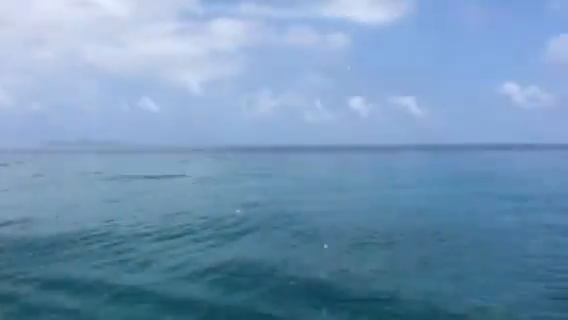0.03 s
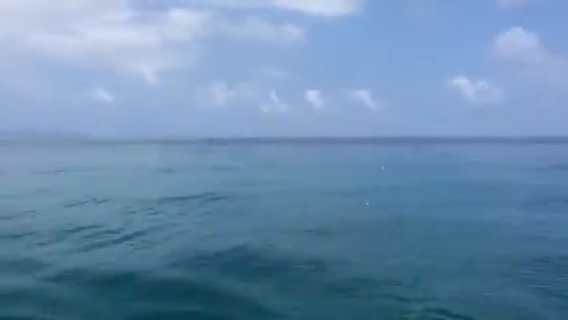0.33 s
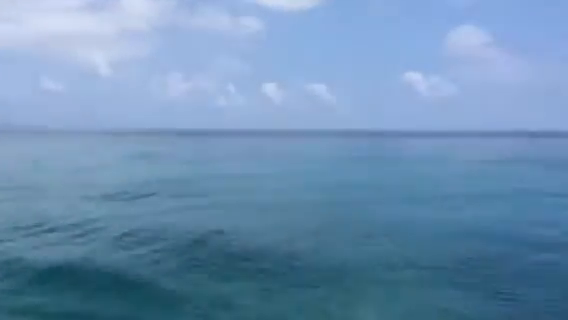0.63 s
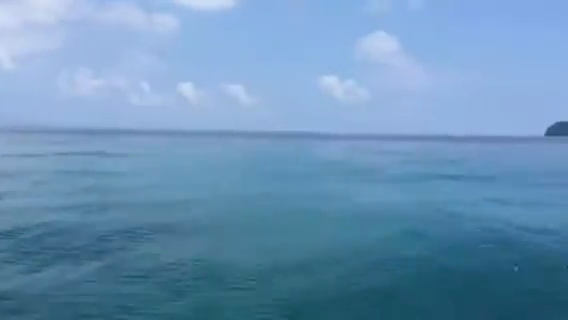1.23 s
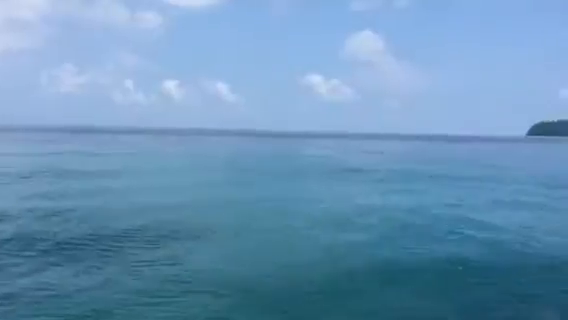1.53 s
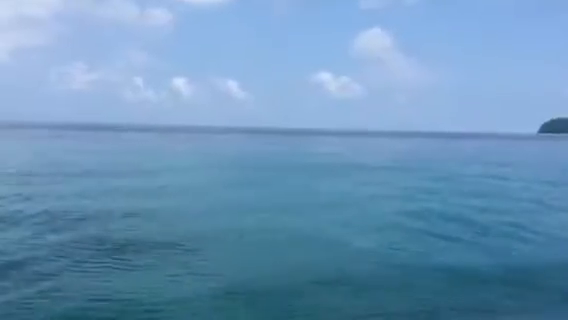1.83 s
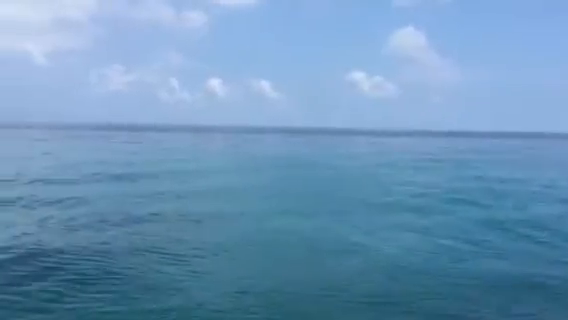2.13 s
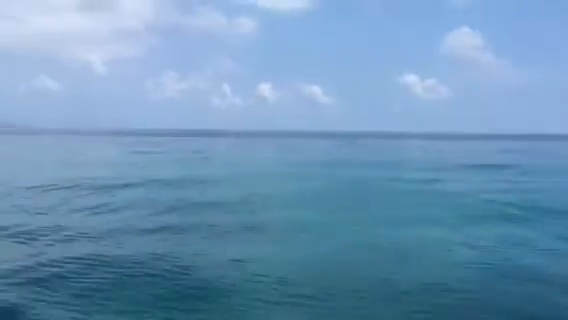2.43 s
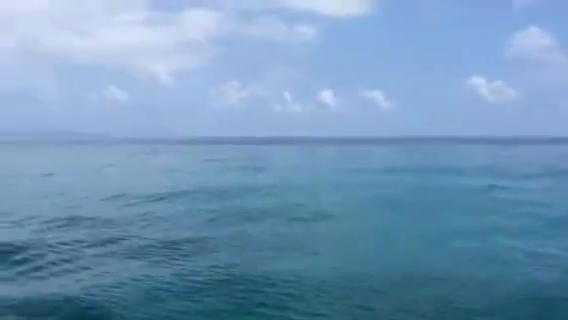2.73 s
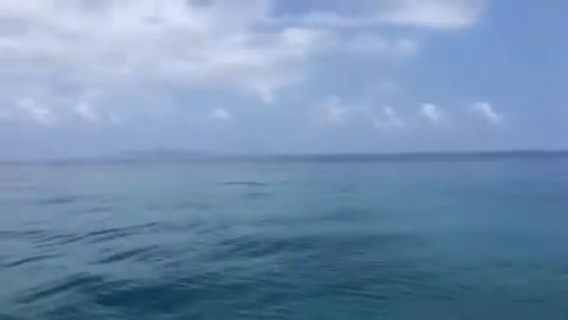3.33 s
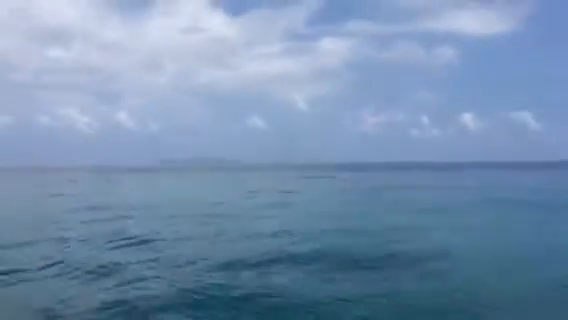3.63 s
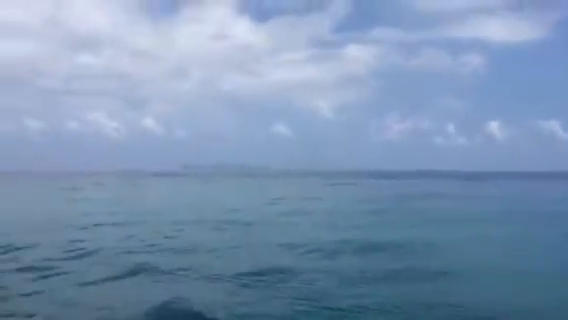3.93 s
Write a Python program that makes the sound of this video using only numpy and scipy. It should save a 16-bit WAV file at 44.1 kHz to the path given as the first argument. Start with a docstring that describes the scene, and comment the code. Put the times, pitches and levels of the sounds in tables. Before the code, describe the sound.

A single-cylinder boat engine, heard on board on open sea, thumps rapidly with squeaks and rattles, then slows. Water hisses and slaps along the hull, and spray swells midway before fading.

```python
"""A single-cylinder long-tail boat engine, heard on board, starts near ten strokes a second over hull
rumble, rattling loose parts and hissing wash. Each stroke is an exhaust thump, a squeak, a hollow pipe
ring and a rasping knock that booms in the hull. Droplets tick and water slaps as it is throttled back.
Near 2 s spray swells and the squeak dies away; by 4 s the engine is near five strokes a second and the
water has faded."""
import sys
import numpy as np
from scipy.fft import rfft, irfft, next_fast_len
from scipy.io import wavfile
from scipy.ndimage import map_coordinates

SR = 44100
rng = np.random.default_rng(int(sys.argv[2]) if len(sys.argv) > 2 else 0)


def to_wav(sig):
    """Store sig (one row per channel, or 1-D mono) as 16-bit WAV at the path in sys.argv[1].

    Samples outside -1..1 are clipped; the rate is SR.
    """
    pcm = np.clip(np.atleast_2d(sig), -1, 1) * 32767
    pcm = np.round(pcm).astype(np.int16)
    wavfile.write(sys.argv[1], SR, pcm.T)  # frames by channels


N = 176400

# engine speed (time [s], rate [strokes/s])
STROKE_RATE = [(0.0, 9.798), (0.4, 9.15), (0.8, 8.868), (1.15, 8.374), (1.42, 8.953), (1.7, 7.571),
               (2.0, 7.502), (2.7, 6.343), (3.3, 5.444), (4.0, 5.359)]
# spectrum of wash and droplets (frequency [Hz], gain [dB])
FIZZ_COLOUR = [(500, -56), (3000, 5), (4800, 3), (7200, -0.5), (9500, 4), (10500, 1), (11300, 5),
               (15500, 1.5)]
FLUTTER_DB = 1.3


def amp(db):
    """Decibels to gain."""
    return 10 ** (np.asarray(db) / 20)


def unit(x):
    """Scale to rms 1."""
    return x / np.sqrt(np.mean(x ** 2) + 1e-20)


def curve(rows, column=1):
    """One column of (time [s], value, ..) rows, interpolated per sample."""
    columns = np.transpose(rows)
    return np.interp(np.arange(N) / SR, columns[0], columns[column])


def wobble(knots_per_s):
    """Smooth random curve."""
    return map_coordinates(rng.standard_normal(4000), [np.arange(N) * knots_per_s / SR], mode="wrap")


def wavering(hz, scatter_hz, knots_per_s):
    """Tone of straying pitch, rms 1."""
    return np.sqrt(2) * np.sin(2 * np.pi * np.cumsum(hz + scatter_hz * wobble(knots_per_s)) / SR)


def filtered(x, response):
    """x through a frequency response."""
    m = next_fast_len(N + SR // 2)
    return irfft(rfft(x, m) * response(np.fft.rfftfreq(m, 1 / SR)), m)[:N]


def coloured(x, points):
    """x through a (frequency [Hz], gain [dB]) curve, rms 1."""
    hz, db = np.transpose(points)
    return unit(filtered(x, lambda f: amp(np.interp(np.log(f + 1), np.log(hz), db))))


def resonant(x, modes):
    """x through steep resonances (centre [Hz], width [Hz], gain [dB]), rms 1."""
    def band(f, hz, width_hz):
        return 1j * f * width_hz / (hz * hz - f * f + 1j * f * width_hz)

    def response(f):
        return sum(amp(db) * band(f, hz, width_hz) * band(f, hz, hz) for hz, width_hz, db in modes)
    return unit(filtered(x, response))


def noise():
    """White noise."""
    return rng.standard_normal(N)


def grains(per_s, bed_db):
    """Tiny random impacts on a noise bed."""
    return unit(noise() * (rng.random(N) < per_s / SR)) + amp(bed_db) * noise()


def pings(per_s, hz, octaves, cycles, spread_db):
    """Small ringing impacts or bubbles of random pitch and size, rms 1."""
    when, pitch, size, life = rng.random((int(per_s * N / SR), 4)).T[:, :, None]
    ping_hz = hz * 2 ** (octaves * (pitch - .5))
    t = np.arange(SR // 25) / SR
    gain = amp(-spread_db * np.log(1 - .97 * size))
    decay = np.exp(-ping_hz * t / (cycles * (.5 + life)))
    rings = gain * np.sin(2 * np.pi * ping_hz * t) * decay
    index = (when * N).astype(int) + np.arange(len(t))
    return unit(np.bincount(index.ravel(), rings.ravel(), N)[:N])


def bell(x, width):
    """Gaussian, peak 1 at x = 0."""
    return np.exp(-.5 * (x / width) ** 2)


def blows(times_s, levels_db, rise_s, fall_s):
    """Envelope: a rounded swell at each time."""
    t = np.arange(N) / SR
    return sum(amp(db) * bell(t - s, np.where(t < s, rise_s, fall_s))
               for s, db in zip(times_s, levels_db))


def impacts(rows, rise_s, fall_s):
    """Envelope: a sharp peak per (time [s], level [dB]) row; rise and fall span 60 dB."""
    t = np.arange(N) / SR
    return sum(amp(db - 60 * np.minimum(np.abs(t - s) / np.where(t < s, rise_s, fall_s), 2))
               for s, db in rows)


def turns():
    """Engine cycles per sample, accumulated; firings fall on whole numbers."""
    return .04 + np.cumsum(curve(STROKE_RATE)) / SR


def gate(at, rise, fall):
    """One swell per cycle; arguments in cycles."""
    offset = (turns() - at + .5) % 1 - .5
    return bell(offset, np.where(offset < 0, rise, fall))


def strokes(at):
    """Per sample: nearest stroke's index and time [s] since its phase `at` [cycles]."""
    turn = turns() - at
    nearest = np.round(turn)
    return nearest.astype(int) + 1, (turn - nearest) / curve(STROKE_RATE)


def hull_rumble():
    """The hull rumbles throughout."""
    # rumble strength (time [s], relative level [dB])
    levels = [(0, -26), (1.5, -29), (2.5, -28.5), (4, -32)]
    # hull spectrum (frequency [Hz], gain [dB])
    colour = [(20, -49), (32, -37), (48, -4.5), (68, 2.5), (100, 2), (135, -4.5), (190, -5), (275, -9.5),
              (340, -19.5), (600, -30), (1500, -92)]
    return amp(curve(levels) + 1) * coloured(noise(), colour)


def rattle():
    """Loose parts clatter and scrape, most just after each firing."""
    # rattle strength (time [s], relative level [dB])
    levels = [(0, -36.5), (1, -38), (1.8, -41.5), (2.4, -37), (3.3, -41.5), (4, -46)]
    # scrape spectrum (frequency [Hz], gain [dB])
    colour = [(150, -41), (350, 10), (600, -2.5), (900, 4), (1400, 5.5), (2200, 2), (2700, -1), (4100, -6),
              (4800, -14.5), (9000, -72)]
    shake = 1 + .41 * gate(at=.13, rise=.029, fall=.019)
    clatter = amp(-5.5) * pings(per_s=240, hz=1288, octaves=1.9, cycles=14.2, spread_db=2.8)
    scrape = amp(-3.5) * coloured(noise(), colour)
    return amp(curve(levels) + FLUTTER_DB * wobble(45)) * shake * (clatter + scrape)


def wash():
    """Bubbles fizz along the hull, pulsing with the engine and fading as the boat slows."""
    # wash strength (time [s], relative level [dB])
    levels = [(0, -48), (.32, -48.5), (.9, -52.5), (1.9, -56), (3, -56.5), (3.55, -60.5), (3.8, -66),
              (3.92, -69.5)]
    bubbles = pings(per_s=860, hz=8740, octaves=1.6, cycles=46, spread_db=5)
    fizz = coloured(grains(per_s=5100, bed_db=3.5) + .7 * bubbles, FIZZ_COLOUR)
    pulse = 1 + .38 * gate(at=.82, rise=.024, fall=.27)
    return amp(curve(levels) + 3.5 + FLUTTER_DB * wobble(45)) * pulse * fizz


def exhaust_thump():
    """Each firing: a falling thump, lower as the engine slows, a puff and a weaker afterbeat."""
    # firing strength (time [s], relative level [dB])
    levels = [(0.1, -17.5), (0.64, -18), (0.98, -16), (1.4, -14), (1.82, -15.5), (2.22, -19), (2.51, -25.5),
              (2.7, -19), (3.9, -22.5)]
    sag_hz_per_s, width_s, scatter_db = 2600, .0048, 1.1
    afterbeat_lag_s, afterbeat_width_s = .033, .006
    stroke, t = strokes(at=0)
    detune, size = rng.standard_normal((40, 2))[stroke].T
    hz = (98 + 16 * curve(STROKE_RATE)) * (1 + .06 * detune)
    thump = np.cos(2 * np.pi * (hz * t - .5 * sag_hz_per_s * t * t)) * bell(t, width_s)
    afterbeat = np.cos(2 * np.pi * hz * t) * bell(t - afterbeat_lag_s, afterbeat_width_s)
    puff = gate(at=0, rise=.02, fall=.042) * resonant(noise(), [(275, 177, 5.5), (1250, 170, -4.5)])
    gain = amp(curve(levels) + scatter_db * size)
    return gain * (amp(1) * thump + amp(-10) * afterbeat + amp(-16) * puff)


def squeak():
    """A raspy squeak after each firing; as its pitch sinks it excites lower modes of the metal."""
    # squeak course (time [s], relative level [dB], pitch [Hz])
    course = [(0.1, -45, 3500), (.32, -40, 3900), (.76, -41, 3950), (.87, -35, 3250), (1.23, -41, 3300),
              (1.34, -47, 2750), (1.45, -41, 2450), (1.57, -39, 3050), (1.7, -43, 2750),
              (1.83, -38.5, 3000), (1.96, -44.5, 2900), (2.4, -66, 2700)]
    # metal modes (frequency [Hz], gain [dB])
    modes = [(4130, 0), (3820, -4), (3550, -3), (3070, 1), (2680, -3), (2220, -2)]
    reach_octaves, flutter_db = .2, 2.6
    pitch_hz = curve(course, column=2)
    weights = np.array([amp(db) * bell(np.log2(hz / pitch_hz), reach_octaves) for hz, db in modes])
    rings = np.array([amp(flutter_db * wobble(90)) * wavering(hz, scatter_hz=62, knots_per_s=300)
                      for hz, _ in modes])
    metal = unit(np.sum(weights * rings, 0) / np.linalg.norm(weights, axis=0))
    rub = amp(-5) * wobble(900) * wavering(pitch_hz, scatter_hz=300, knots_per_s=900)
    return amp(curve(course) + 1) * gate(at=.08, rise=.045, fall=.09) * (metal + rub)


def pipe_ring():
    """The exhaust pipe's hollow resonance swells and dies once a stroke, never quite alike."""
    # ring strength (time [s], relative level [dB])
    levels = [(0.03, -42), (1.02, -25.5), (1.8, -22.5), (2.57, -24.5), (2.9, -28.5), (3.97, -27)]
    hz, at_cycles, width_s, scatter_db = 163, .34, .019, .2
    stroke, t = strokes(at_cycles)
    late, size, detune = rng.standard_normal((40, 3))[stroke].T
    t = t - .055 * late / hz
    tone = np.cos(2 * np.pi * hz * (1 + .025 * detune) * t)
    taper = np.abs(np.cos(np.pi * (turns() - at_cycles))) ** .5  # zero where strokes join
    return amp(curve(levels) + 3 - scatter_db * size) * bell(t, width_s) * taper * tone


def knock():
    """Between firings a chug falls in pitch: a rasp, a hollow clonk, then the boom of the hull."""
    # chugs (time [s], rasp level [dB], clonk level [dB], boom level [dB])
    chugs = [(.062, -37, -46, -34), (0.377, -41, -37, -21.5), (0.487, -40, -31.5, -22),
             (0.61, -38, -36.5, -21), (.712, -34, -33.5, -23.5), (0.82, -37, -29.5, -18),
             (0.941, -36.5, -30.5, -29), (1.069, -36.5, -28.5, -23), (1.179, -50, -30.5, -18.5),
             (1.29, -41, -40, -23), (1.403, -38.5, -37, -19.5), (1.512, -43, -31, -18),
             (1.637, -34, -24.5, -32), (1.768, -35.5, -38, -37), (1.896, -36.5, -32.5, -26),
             (2.029, -36.5, -39.5, -27), (2.171, -31, -30, -23), (2.313, -37.5, -31, -19),
             (2.457, -34.5, -34, -25.5), (2.611, -35.5, -29.5, -17), (2.76, -39, -41.5, -19.5),
             (2.924, -36, -38.5, -21), (3.095, -34, -40.5, -26.5), (3.269, -40, -36, -24),
             (3.447, -35.5, -38, -19.5), (3.63, -36.5, -28, -15), (3.822, -37.5, -27, -18.5)]
    # rasp spectrum (frequency [Hz], gain [dB])
    rasp_colour = [(250, 10), (600, -7.5), (900, 10.5), (1400, 7.5), (2200, 8.5), (2900, -5.5), (4300, -11),
                   (6000, -19), (15000, -25)]
    # hollow resonances (centre [Hz], width [Hz], gain [dB])
    clonk_modes = [(228, 70, 2), (392.4, 58, 6.5), (477, 75, -1.5), (588, 130, -7.5), (775, 95, -6.5),
                   (990, 150, -19.5)]
    # hull boom spectrum (frequency [Hz], gain [dB])
    boom_colour = [(25, -21), (50, -14), (80, -1), (110, -2), (150, -4), (260, -16.5), (310, -17.5),
                   (360, -33), (800, -65)]
    rasp_lead_s, boom_lag_s = .01, .0079
    times_s, rasp_db, clonk_db, boom_db = np.transpose(chugs)
    grit = coloured(grains(per_s=900, bed_db=-4.5), rasp_colour)
    rasp = blows(times_s - rasp_lead_s, rasp_db, rise_s=.01, fall_s=.014) * grit
    clonk = blows(times_s, clonk_db, rise_s=.006, fall_s=.018) * resonant(noise(), clonk_modes)
    hull_noise = coloured(noise(), boom_colour)
    hull_tone = amp(-2.5) * wavering(hz=81.3, scatter_hz=11.8, knots_per_s=30)
    boom = blows(times_s + boom_lag_s, boom_db, rise_s=.012, fall_s=.026) * unit(hull_noise + hull_tone)
    return amp(-.5) * (rasp + clonk + boom)


def droplets():
    """Single droplets tick."""
    # droplet hits (time [s], level [dB])
    hits = [(.256, -41.5), (.47, -33), (1.14, -40), (1.402, -36), (1.6, -44)]
    return impacts(hits, rise_s=.002, fall_s=.014) * coloured(noise(), FIZZ_COLOUR)


def slaps():
    """Water slaps beside the hull."""
    # water hits (time [s], level [dB])
    hits = [(.308, -36.5), (1.232, -39), (2.063, -32.5), (2.244, -31.5)]
    # slap spectrum (frequency [Hz], gain [dB])
    colour = [(800, -2.5), (3000, -4), (7000, -11), (15000, -26)]
    return impacts(hits, rise_s=.012, fall_s=.09) * coloured(noise(), colour)


def spray():
    """A sheet of spray spatters, loudest just after 2 s."""
    # spray strength (time [s], level [dB])
    levels = [(0, -66), (1.98, -53.5), (2.08, -42), (2.3, -48), (2.48, -43), (2.75, -49.5), (3.5, -51),
              (3.78, -64.5)]
    # spray spectrum (frequency [Hz], gain [dB])
    colour = [(500, 1), (2000, -4.5), (6500, -4.5), (9000, -11.5), (15000, -27)]
    gain = amp(curve(levels) + FLUTTER_DB * wobble(40.1))
    return gain * coloured(grains(per_s=4200, bed_db=-3), colour)


def scene():
    """Engine, boat and water, mono."""
    engine = exhaust_thump() + pipe_ring() + squeak() + knock()
    boat = hull_rumble() + rattle()
    water = wash() + spray() + slaps() + droplets()
    return (engine + boat + water)[None]


def record(dry):
    """Click-free fades at both ends, then a hard treble limit."""
    fade_s, top_hz = .008, 15450
    t = np.arange(N) / SR
    fades = np.clip(np.minimum(t, t[-1] - t) / fade_s, 0, 1)
    return filtered(dry[0] * fades, lambda hz: hz < top_hz)[None]


dry = scene()
out = record(dry)
to_wav(out)
```